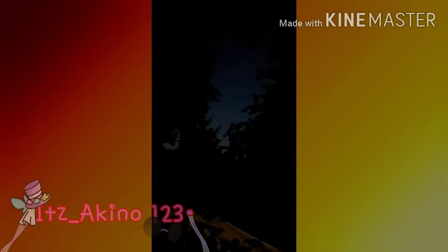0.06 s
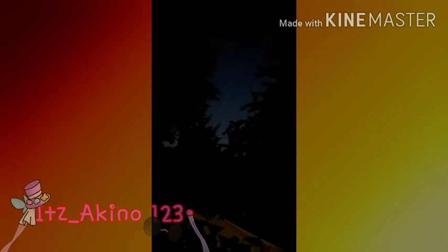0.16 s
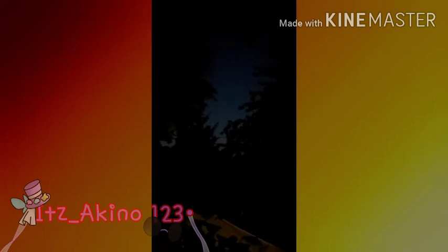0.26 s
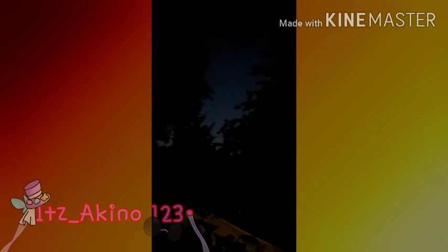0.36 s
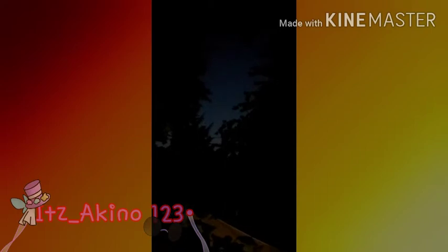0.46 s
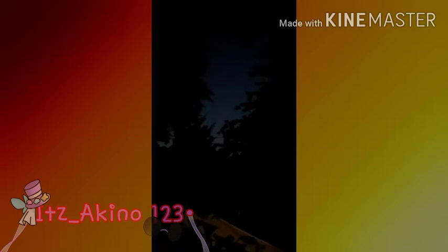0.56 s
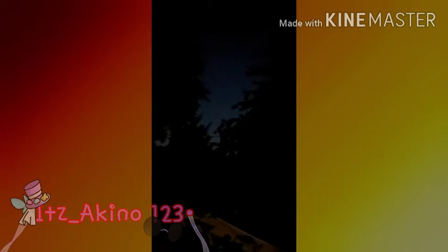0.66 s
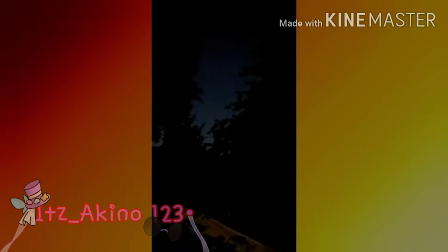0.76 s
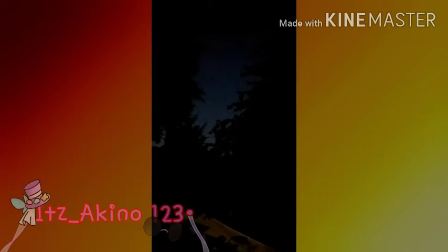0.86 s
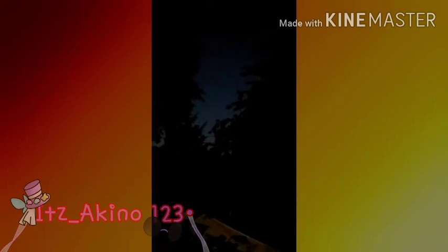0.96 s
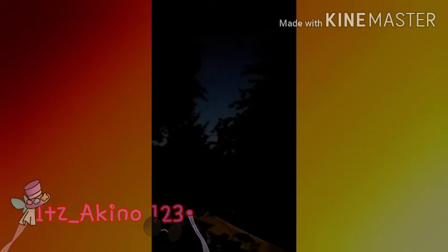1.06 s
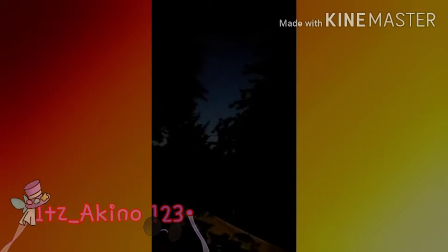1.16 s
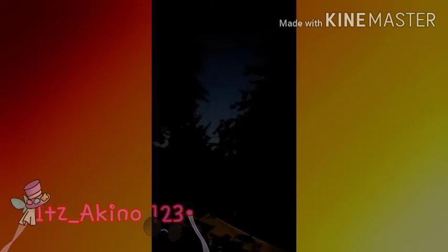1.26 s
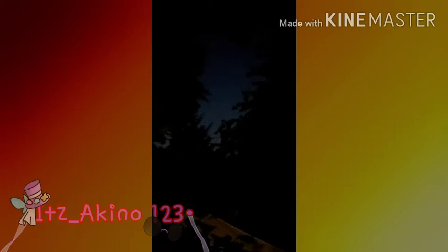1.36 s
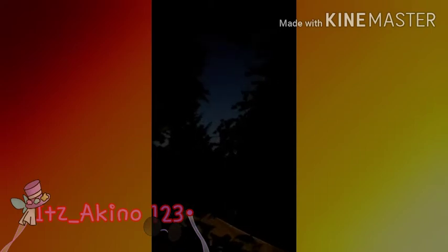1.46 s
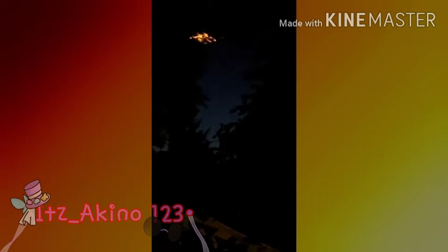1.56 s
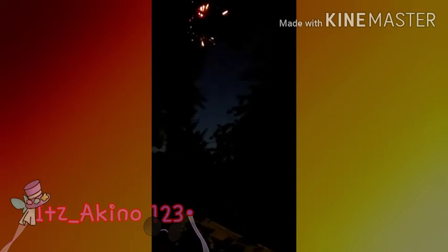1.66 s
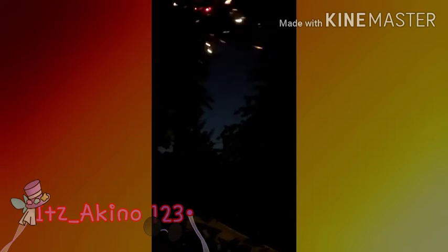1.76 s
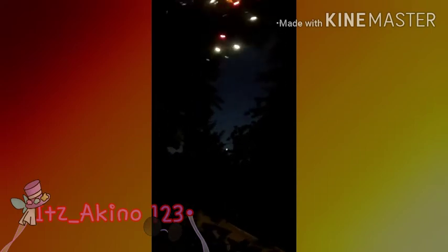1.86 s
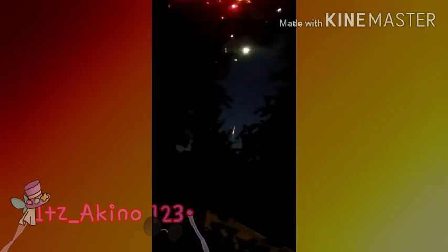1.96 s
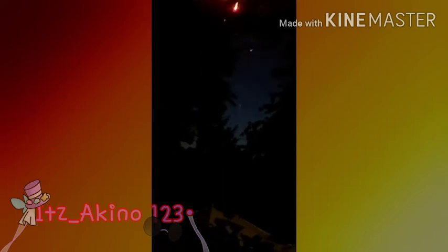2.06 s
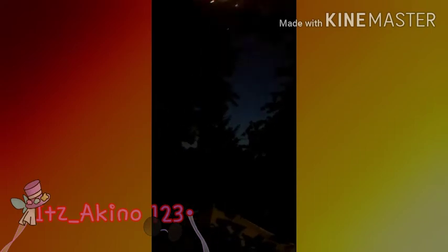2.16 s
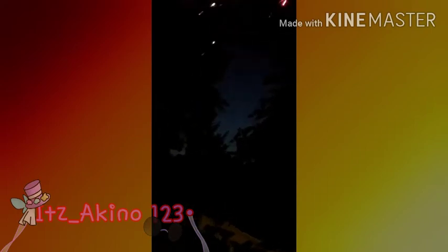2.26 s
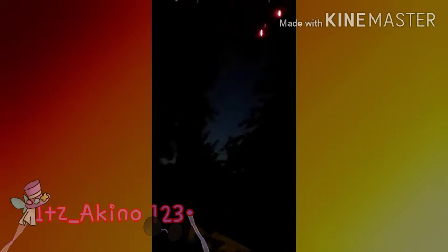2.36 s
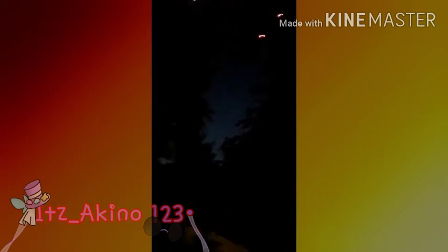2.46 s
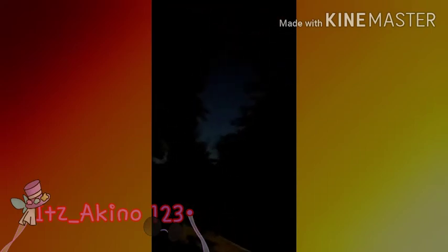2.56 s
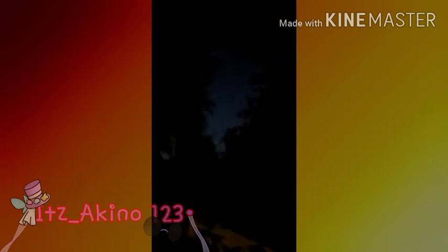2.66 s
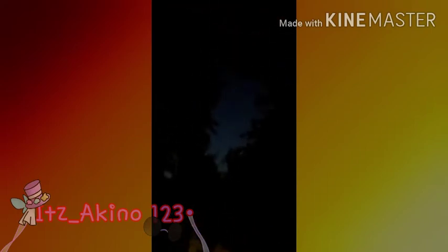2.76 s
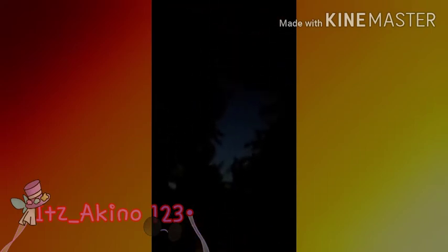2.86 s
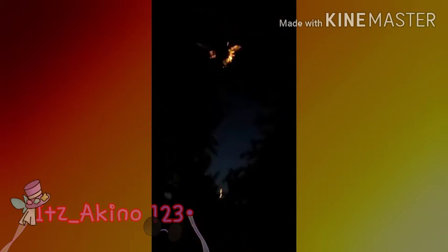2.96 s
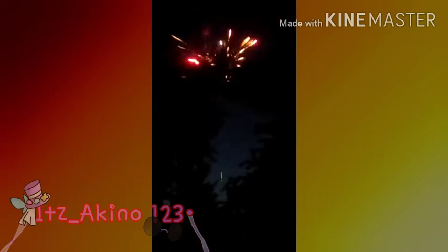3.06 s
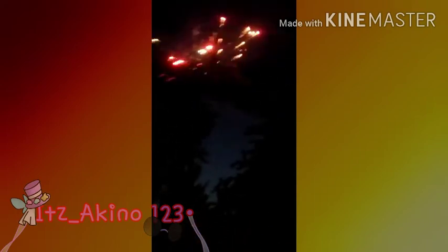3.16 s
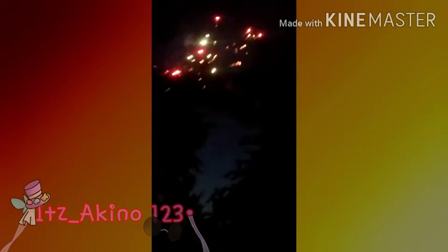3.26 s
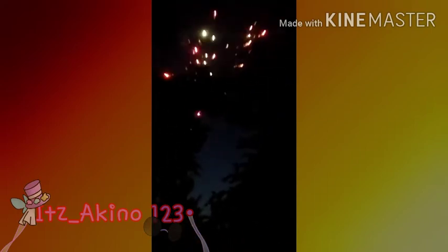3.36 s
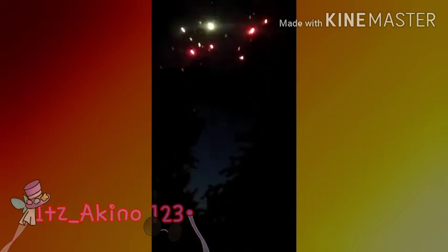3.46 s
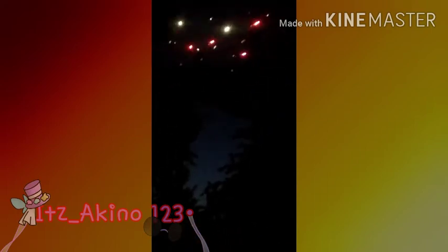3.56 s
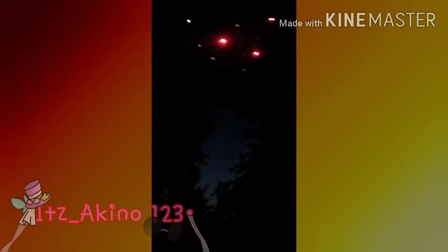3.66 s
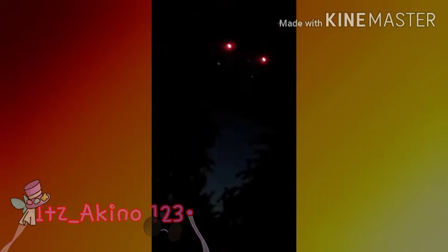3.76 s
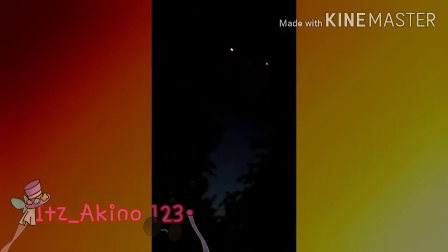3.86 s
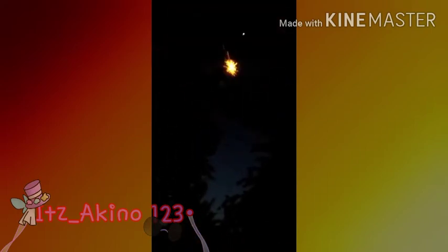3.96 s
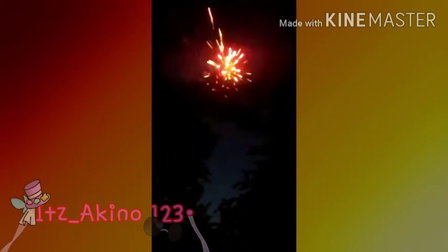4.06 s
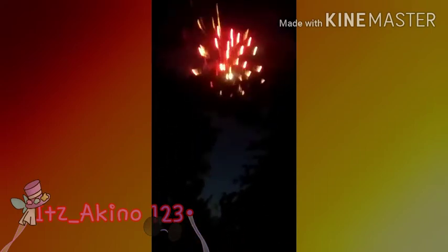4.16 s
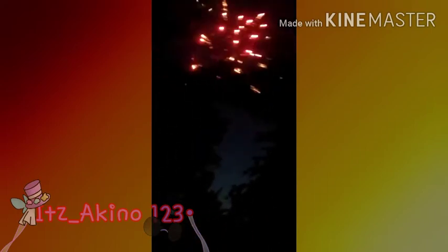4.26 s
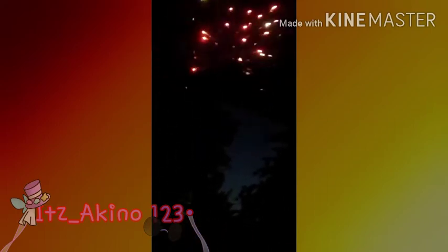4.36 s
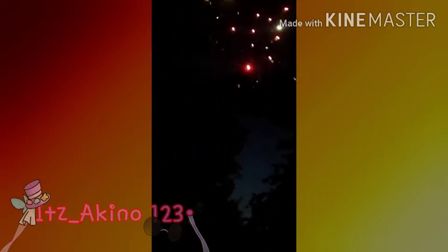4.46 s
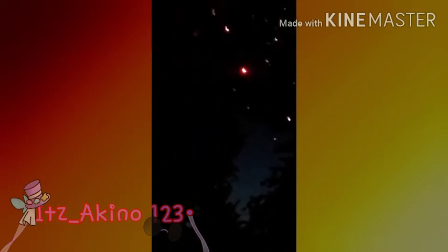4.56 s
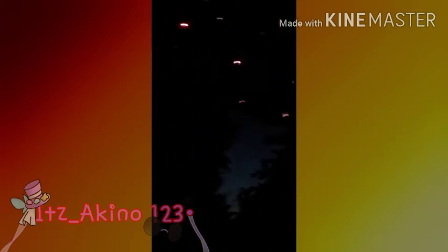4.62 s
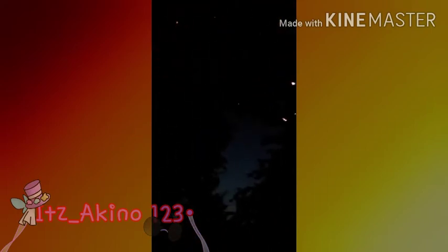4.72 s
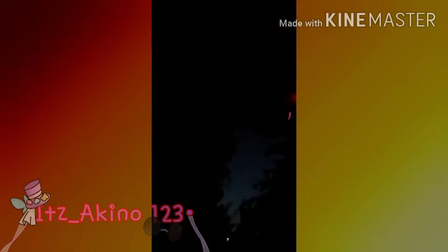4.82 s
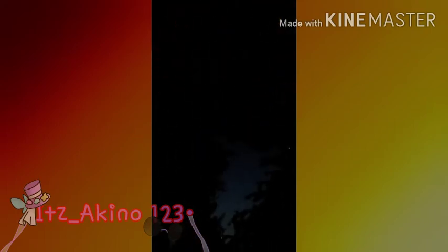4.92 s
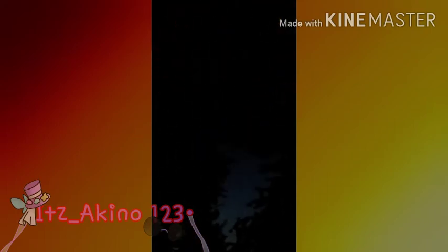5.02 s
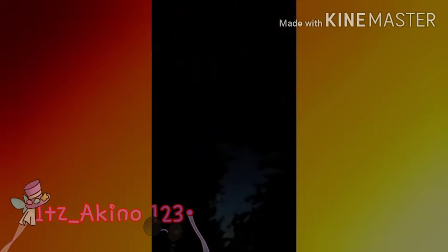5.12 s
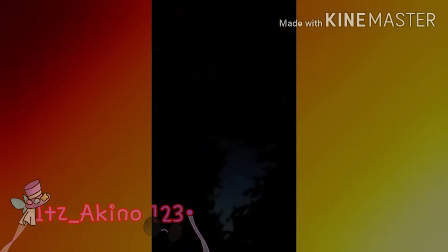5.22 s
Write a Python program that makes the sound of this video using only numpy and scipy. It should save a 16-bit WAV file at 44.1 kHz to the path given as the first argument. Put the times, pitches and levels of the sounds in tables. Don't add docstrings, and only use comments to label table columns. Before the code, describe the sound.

A quiet outdoor night with faint town rumble, hiss and thin insects, then two hard firework bangs in quick succession, a softer distant report, a third bang and a fourth. Each overloads a small nasal microphone, slaps back off house walls and rolls away in echo. Dry debris ticks and papery rustle fill the gaps, and two duller reports close it.

```python
import sys
import numpy as np
from scipy import signal
from scipy.fft import rfft, irfft, next_fast_len
from scipy.io import wavfile
from scipy.ndimage import uniform_filter1d

SR = 44100
rng = np.random.default_rng(int(sys.argv[2]) if len(sys.argv) > 2 else 0)


def store_wav(level_fs):
    pcm = np.round(np.clip(np.atleast_2d(level_fs), -1, 1) * 32767)
    wavfile.write(sys.argv[1], SR, pcm.T.astype(np.int16))


def to_linear_factor(level_db):
    exponent = np.asarray(level_db, float) / 20
    return 10 ** exponent


N = 233156

# (time [s], near wash [dB], far wash [dB], treble tilt [dB/octave],
# sharpness of the port resonances [ratio])
BURSTS = [
    (1.8082, -6, -18, 0, 1.3),
    (2.1449, -4.5, -19, 0.16, 1.57),
    (3.2298, -6.5, -20, 0.18, 1.48),
    (4.2531, -5.5, -19.5, -0.6, 2.42),
]
# (time [s], thud [dB], wash [dB], treble tilt [dB/octave], decay stretch [ratio])
REPORTS = [(.03, -65, -58, -0.5, 0.77), (.457, -38.5, -52, 1.4, 0.38), (.82, -65, -47, -10, 0.44),
           (.965, -50.5, -48.5, -12.5, 0.26), (1.11, -58, -60, 5.5, 0.31), (1.21, -59, -58, -15, 0.54),
           (1.535, -70, -59.5, 6.5, 0.81), (2.9864, -20.5, -33, 3.5, 0.84), (4.829, -26, -37.5, 2.3, 0.83),
           (5.226, -25, -36.5, -1, 0.18)]
# (frequency [Hz], t60 [s])
FAR_DECAY = [(200, 1.1), (800, 1.295), (3000, 1.37), (7000, 1.25), (13000, 1.2)]
# (frequency [Hz], width [Hz], level [dB])
PORT = [(2970, 250, 5), (4127, 490, 5), (5450, 860, 5), (6440, 360, 2.5), (8260, 800, 2)]
# (frequency [Hz], width [Hz], level [dB])
YARD = [(175, 6.1, 12.5), (215, 3, 13), (246, 31, 8), (303.3, 19, 11.5), (341, 8.8, 5), (430, 38, 6.5)]


def unit(x):
    return x / np.sqrt(np.mean(x ** 2) + 1e-20)


def along(points, hz):
    f, v = np.transpose(points)
    return np.interp(np.log(hz + 1), np.log(f + 1), v)


def bumps(modes, hz):
    return sum(db / (1 + ((hz - centre) / width) ** 2 * 4) for centre, width, db in modes)


def causal(x, colour_db):
    m = next_fast_len(len(x) + 8192)
    cepstrum = irfft(np.log(to_linear_factor(colour_db(np.fft.rfftfreq(m, 1 / SR)))), m)
    cepstrum[1:m // 2] *= 2
    cepstrum[m // 2 + 1:] = 0
    return irfft(rfft(x, m) * np.exp(rfft(cepstrum)), m)[:len(x)]


def patchy(size, depth_db, decay_db):
    hz, t, z = signal.stft(rng.standard_normal(size), SR, nperseg=256)
    field = uniform_filter1d(rng.standard_normal(z.shape), size=4, axis=0)
    field = uniform_filter1d(field, size=5, axis=1)
    gain = to_linear_factor(depth_db * unit(field) + decay_db(hz[:, None], t))
    return signal.istft(z * gain, SR, nperseg=256)[1][:size]


def add(out, s, sound):
    part = out[round(s * SR):][:len(sound)]
    part += sound[:len(part)]


def drifting_gain(rows):
    return to_linear_factor(np.interp(np.arange(N) / SR, *np.transpose(rows)))


def swells(rows, rise_db, fall_db):
    t = np.arange(N) / SR
    gain = to_linear_factor(-97)
    for s, hold, db in rows:
        climb = rise_db * np.clip(s - t, 0, None)
        fade = fall_db * np.clip(t - s - hold, 0, None)
        gain = gain + to_linear_factor(db - climb - fade)
    return gain


def ring(t, hz, t60, wander):
    phase = 2 * np.pi * hz * t + wander * np.cumsum(rng.standard_normal(len(t)))
    return -np.sin(phase) * to_linear_factor(-60 * t / t60)


def wash(t, t60s, patch_db, rise):
    return (1 - np.exp(-t / rise)) * patchy(len(t), patch_db, lambda hz, u: -60 * u / t60s(hz))


def case_db(hz, tilt_db, sharp):
    # (frequency [Hz], density [dB per Hz])
    case_curve = [(135, -56), (170, -44.5), (300, -20), (480, -10), (700, 3.5), (1000, -1), (1500, -10),
                  (2100, -16.5), (3500, -28), (5500, -33.5), (6500, -39), (7300, -44.5), (10000, -51),
                  (15000, -60)]
    tilt = tilt_db * np.log2(np.clip(hz, 200, 16000) / 1000)
    return along(case_curve, hz) + tilt + sharp * bumps(PORT, hz) + 0.89 * bumps(YARD, hz)


def heard(x, tilt_db, sharp):
    colour = lambda hz: case_db(hz, tilt_db, sharp)
    impulse = np.arange(4096) == 0
    return causal(x, colour) / np.linalg.norm(causal(impulse, colour))


def night():
    # (frequency [Hz], density [dB per Hz])
    town_curve = [(120, -43), (170, -13.5), (300, -7), (480, -1.5), (700, 7), (1000, -2.5), (1700, -5.5),
                  (2600, -13), (4000, -21.5), (8000, -26.5)]
    # (time [s], level [dB])
    town_level = [
        (0, -56),
        (1.8, -59),
        (2.8, -53),
        (5.29, -53),
    ]
    # (time [s], hold [s], level [dB])
    insect_swells = [
        (.5, .37, -71.5),
        (1.35, .07, -72),
        (2.6, .4, -82),
        (5.0, .3, -76),
    ]
    # (frequency [Hz], density [dB per Hz])
    hiss_curve = [(300, 1.5), (3000, 4.5), (15000, -2)]
    insect_curve = [(3800, -31), (4900, -2.0), (6300, -3.0), (7500, -42)]
    still = lambda hz, u: 0 * u
    town = causal(patchy(N, 1.6, still), lambda hz: along(town_curve, hz) + 1.0 * bumps(YARD, hz))
    insects = causal(patchy(N, 2.1, still), lambda hz: along(insect_curve, hz))
    hiss = causal(rng.standard_normal(N), lambda hz: along(hiss_curve, hz))
    chorus = swells(insect_swells, 200, 120) * unit(insects)
    return drifting_gain(town_level) * unit(town) + chorus + to_linear_factor(-67) * unit(hiss)


def rustle():
    # (time [s], hold [s], level [dB])
    paper_swells = [
        (2.475, .02, -71),
        (2.57, 0.1, -62.5),
        (2.82, .12, -69),
        (4.54, 0.13, -66),
        (4.85, 0.11, -65),
    ]
    # (time [s], hold [s], level [dB])
    chirps = [
        (.13, .04, -71),
        (.96, 0.044, -71),
        (1.19, .06, -73),
    ]
    paper_curve = [(2000, -25), (5500, 1.5), (9500, -4.0), (15000, -8)]
    grain_db = 2.3 * rng.exponential(size=N // 64 + 1).clip(0, 3.5)
    grains = rng.standard_normal(N) * to_linear_factor(grain_db.repeat(64)[:N])
    paper = unit(causal(grains, lambda hz: along(paper_curve, hz)))
    cricket = unit(causal(rng.standard_normal(N), lambda hz: -50 + bumps([(2585, 300, 44)], hz)))
    return swells(paper_swells, 150, 200) * paper + swells(chirps, 150, 130) * cricket


def ticks():
    # (time [s], snap peak [dB], knock [dB])
    debris = [(2.498, -37.5, -19), (2.58, -45, -4), (2.6257, -29.5, 2.5), (2.6994, -50, -13),
              (2.8194, -58, -8), (4.0482, -52, -9), (4.54, -45.5, -6), (4.58, -54, -9), (4.62, -48, -9),
              (4.8608, -56, 19)]
    snap_curve = [(1500, -33), (5500, -3.5), (9000, -22.0), (15000, -25)]
    out, t = np.zeros(N), np.arange(SR // 10) / SR
    for s, db, knock_db in debris:
        burst = to_linear_factor(-60 * t / 0.04) * rng.standard_normal(len(t))
        snap = causal(burst, lambda hz: along(snap_curve, hz))
        knock = (1 - np.exp(-t / 0.00062)) * ring(t, 1800, 0.019, 0.04)
        add(out, s, to_linear_factor(db + 5.5) * snap + to_linear_factor(db + knock_db) * knock)
    return out


def booms():
    # (time [s], level [dB], slope [dB/octave])
    pushes = [
        (0.964, -65, -24),
        (1.21, -62.5, -12),
        (1.811, -39.5, -2),
        (2.146, -35, 3.5),
        (2.901, -58.5, 2),
        (3.232, -42.5, -5.5),
        (4.255, -38, 1),
        (5.224, -55.5, 6),
    ]
    # (frequency [Hz], level [dB], t60 [s])
    yard_modes = [(183, -4, 0.83), (198, -12, 1.04), (242.7, -0.5, 0.84), (298.4, 10.5, 0.32),
                  (330, -1.5, 0.77), (412, 3.5, 0.17), (520, 3, 0.79), (563, -3, 0.53)]
    out, t = np.zeros(N), np.arange(SR) / SR
    for s, db, slope_db in pushes:
        waves = np.zeros(len(t))
        for hz, mode_db, t60 in yard_modes:
            waves += to_linear_factor(mode_db + slope_db * np.log2(hz / 250)) * ring(t, hz, t60, 0.01)
        add(out, s, to_linear_factor(db) * (1 - np.exp(-t / 0.028)) * waves)
    return out


def reports():
    # (time [s], level [dB], pitch [Hz])
    finger = (1.535, -61, 80)
    out, bump, t = np.zeros(N), np.zeros(N), np.arange(SR) / SR

    def thud(hz):
        modes = ring(t, hz, 0.03, 0.026) + 0.6 * ring(t, 1.5 * hz, 0.02, 0.03)
        return (1 - np.exp(-t / 0.00046)) * modes

    for s, thud_db, far_db, tilt_db, stretch in REPORTS:
        far = wash(t, lambda hz: stretch * along(FAR_DECAY, hz), 0.27, 0.01)
        crack = to_linear_factor(2 - 60 * t / 0.015) * rng.standard_normal(len(t))
        thud_hz = 720 * 2 ** (0.02 * tilt_db)
        echoes = heard(far + crack, tilt_db, 0.44)
        add(out, s, to_linear_factor(thud_db) * thud(thud_hz) + to_linear_factor(far_db) * echoes)
    finger_s, finger_db, finger_hz = finger
    add(bump, finger_s, to_linear_factor(finger_db) * thud(finger_hz))
    out = causal(out, lambda hz: along([(90, -23), (180, 1)], hz))
    return causal(out, lambda hz: along([(6500, 0), (8500, -12), (15000, -13)], hz)) + bump


def slaps():
    # (delay [s], delay shift per bearing [s], level [dB], level per bearing [dB], pitch [Hz])
    walls = [
        (.012, 0.0068, -9.5, 10, 820),
        (.0255, 0.000044, -2, -2.5, 814.5),
        (.050, .003, 1.5, 3.5, 693),
        (.074, -.005, -7.5, -1, 700),
        (.153, .0035, -19, 7, 877),
    ]
    # (bearing [-1..1], slap level [dB])
    aims = [
        (0.98, -3),
        (0.284, -4),
        (-1.0, 0.9),
        (0.038, -14),
    ]
    # (time [s], peak [dB], pitch [Hz])
    lone_slaps = [(.885, -32.5, 563), (1.839, -6, 818), (1.853, -8.5, 930), (2.172, -5.5, 808),
                  (2.215, -4.5, 720), (2.776, -31.5, 784), (4.26, -6.5, 907), (4.28, -10.5, 753),
                  (4.328, -9.5, 707), (4.372, -18.5, 930)]
    wall_curve = [(250, -29.5), (500, -5.5), (1500, 5.0), (2500, -7), (6000, -21), (8000, -28), (12000, -60)]
    returns = []
    for burst, (bearing, slap_db) in zip(BURSTS, aims):
        for delay, lean, db, lean_db, hz in walls:
            returns.append((burst[0] + delay + lean * bearing, slap_db + db + lean_db * bearing, hz))
    facing = [(s + 0.06, thud_db - 6.5, 720) for s, thud_db, *_ in REPORTS]
    out, t = np.zeros(N), np.arange(SR // 10) / SR
    for s, db, hz in returns + facing + lone_slaps:
        body = ring(t, hz, 0.044, 0.065) + 0.37 * ring(t, 1.55 * hz, 0.035, 0.073)
        puff = 0.23 * to_linear_factor(-60 * t / 0.026) * rng.standard_normal(len(t))
        onset = 1 - np.exp(-(t / 0.0019) ** 2)
        add(out, s, to_linear_factor(db) * onset * (body + puff))
    return causal(out, lambda hz: along(wall_curve, hz))


def front(t, hz, length, crack_db, tilt_db):
    rise = 0.00012
    modes = ring(t + rise, hz, 0.12, 0.02)
    modes += 0.4 * ring(t, 1.4 * hz, 0.08, 0.02)
    modes += 0.25 * ring(t, 0.72 * hz, 0.1, 0.02)
    swing = modes * np.tanh((t / rise) ** 2) * np.exp(-(t / length) ** 6)
    crack = to_linear_factor(-60 * t / 0.03) * rng.standard_normal(len(t))
    crack_curve = [(800, -35), (1900, 15.0), (6500, 3.5), (8000, -16), (15000, -34)]
    bright = lambda f: along(crack_curve, f) + bumps(PORT, f) + tilt_db * np.log2(f / 4000 + 0.05)
    click = -to_linear_factor(-19 - 60 * t / 0.00044)
    return to_linear_factor(3.8) * swing + click + to_linear_factor(crack_db - 2.5) * causal(crack, bright)


def bursts():
    # (ringing [Hz], length [s], crack [dB], treble tilt [dB/octave])
    fronts = [
        (800, .0078, -19, 0.1),
        (990, .0058, -17, 1.2),
        (960, .0052, -19, 0.1),
        (930, .006, -14, 1.5),
    ]
    # (frequency [Hz], t60 [s])
    near_decay = [(200, 0.33), (800, 0.22), (3000, 0.33), (7000, 0.44), (13000, 0.13)]
    out, t = np.zeros(N), np.arange(3 * SR // 2) / SR
    for (s, near_db, far_db, tilt_db, sharp), first in zip(BURSTS, fronts):
        near = wash(t, lambda hz: along(near_decay, hz), 0.28, 0.0068)
        far = wash(t, lambda hz: along(FAR_DECAY, hz), 0.84, 0.014)
        echoes = to_linear_factor(near_db) * heard(near, tilt_db, sharp) + to_linear_factor(far_db) * heard(far, tilt_db, sharp)
        behind = 1 - 0.8 * np.exp(-(t / first[1]) ** 4)
        add(out, s, front(t[:SR // 10], *first))
        add(out, s, behind * echoes)
    return out


def scene():
    floor = night() + rustle() + ticks()
    blasts = booms() + reports() + slaps() + bursts()
    return (floor + blasts)[None]


def top_cut(x):
    return signal.sosfilt(signal.butter(12, 16470, fs=SR, output="sos"), x)


def record(dry):
    low_hz, top_hz = 158, 15500
    x = causal(dry[0], lambda hz: along([(20, -12), (low_hz / 2, -9), (low_hz, 0)], hz))
    m = next_fast_len(N + 8192)
    x = irfft(rfft(x, m) * (np.fft.rfftfreq(m, 1 / SR) < top_hz), m)[None, :N]
    x = x / (1 + np.abs(x / 1.005) ** 8) ** (1 / 8)
    return top_cut(x)


dry = scene()
out = record(dry)
store_wav(out)
```